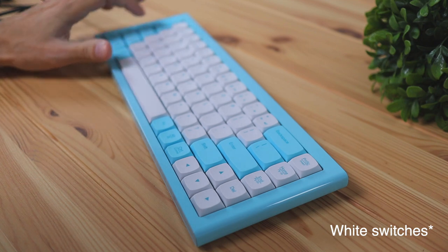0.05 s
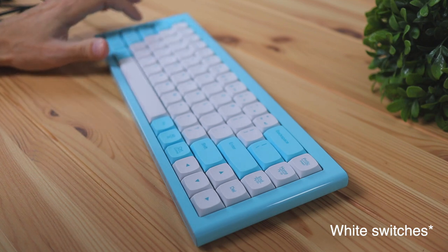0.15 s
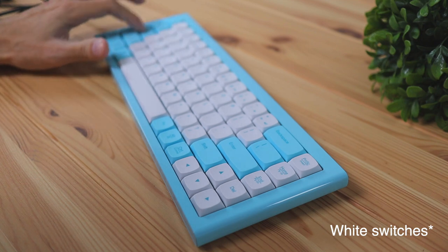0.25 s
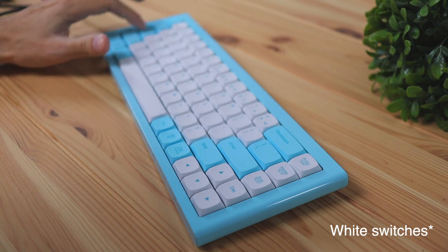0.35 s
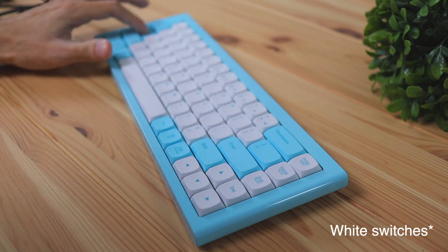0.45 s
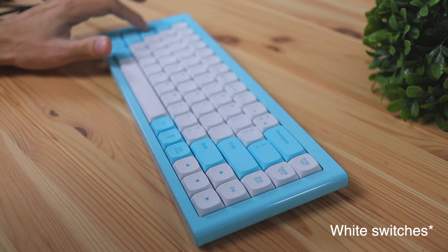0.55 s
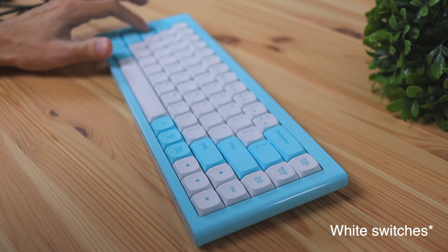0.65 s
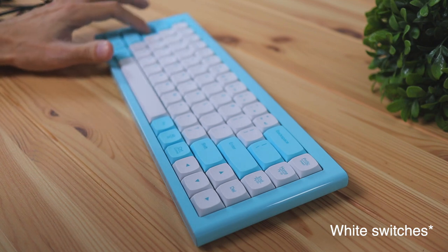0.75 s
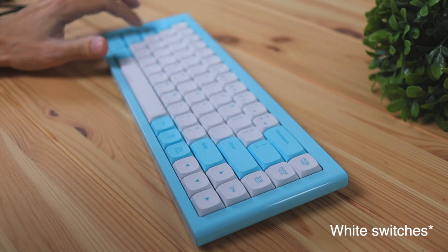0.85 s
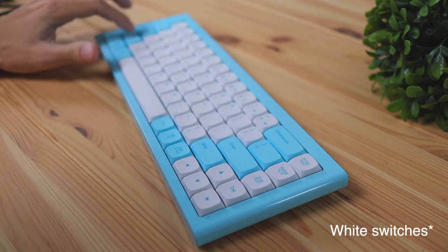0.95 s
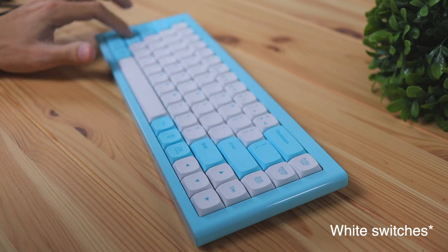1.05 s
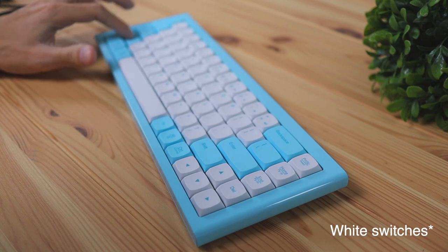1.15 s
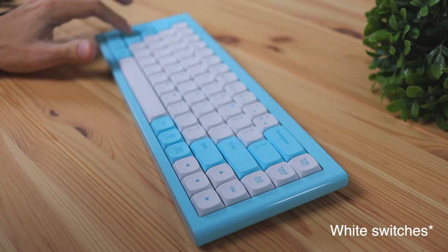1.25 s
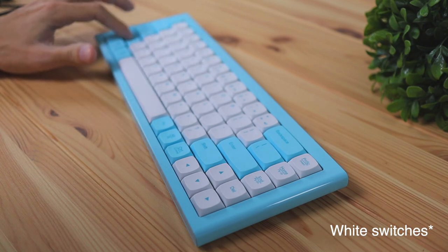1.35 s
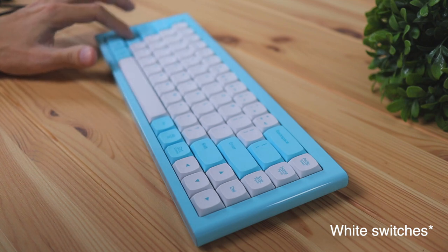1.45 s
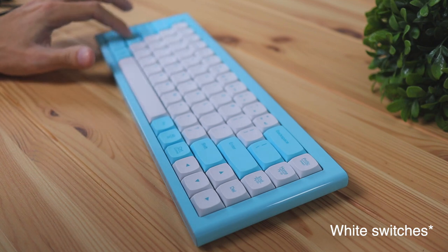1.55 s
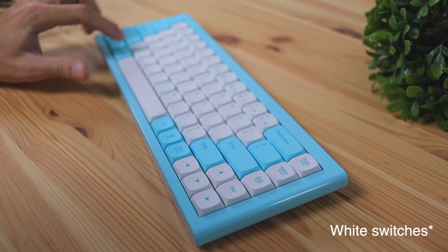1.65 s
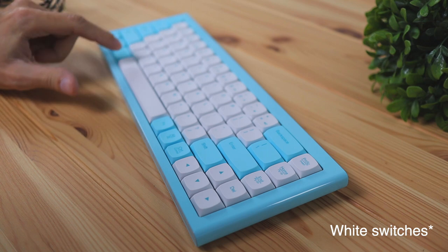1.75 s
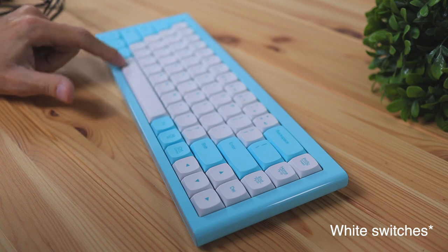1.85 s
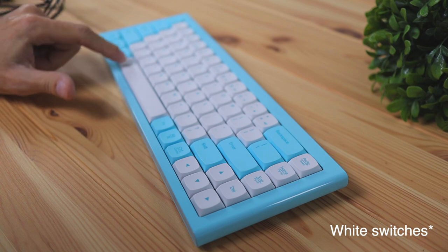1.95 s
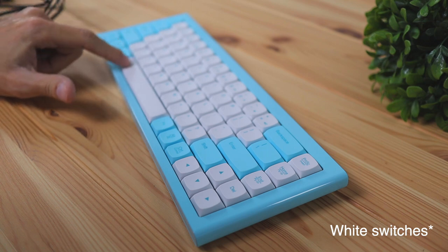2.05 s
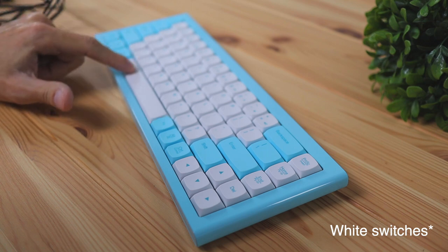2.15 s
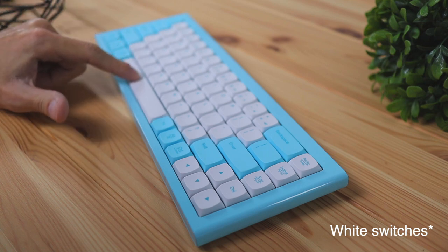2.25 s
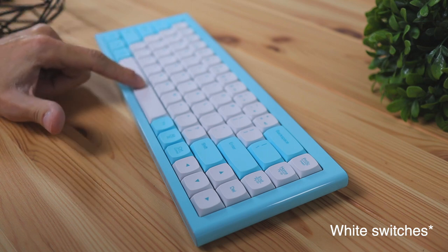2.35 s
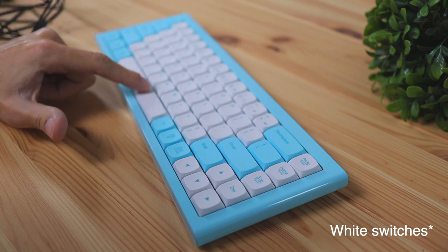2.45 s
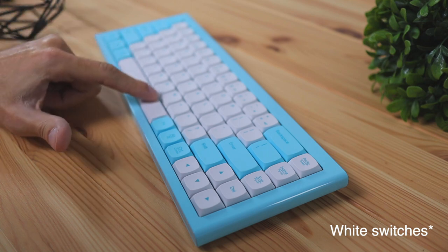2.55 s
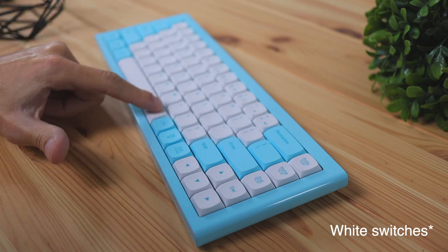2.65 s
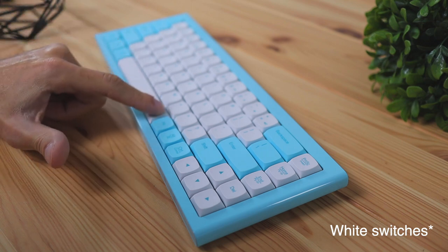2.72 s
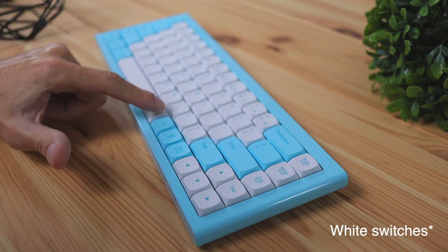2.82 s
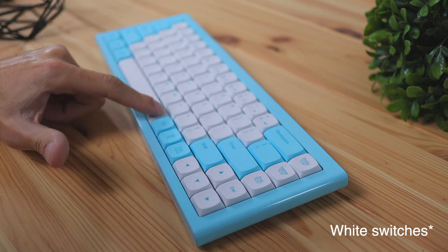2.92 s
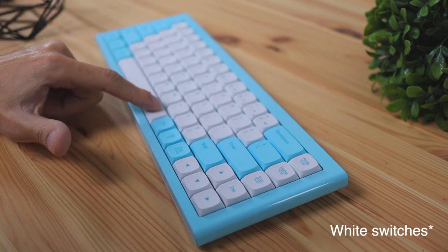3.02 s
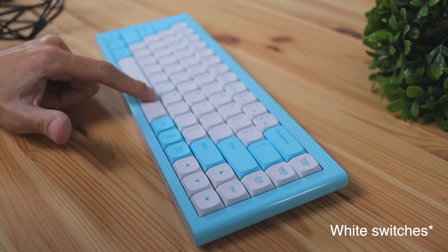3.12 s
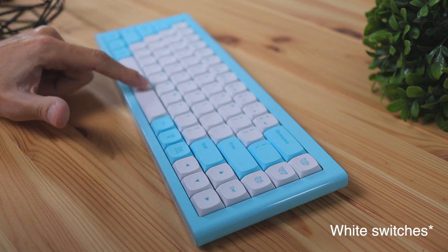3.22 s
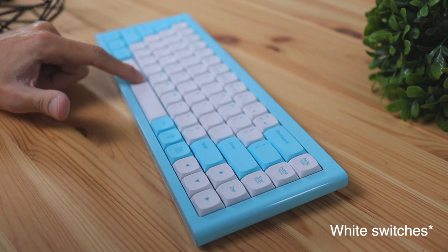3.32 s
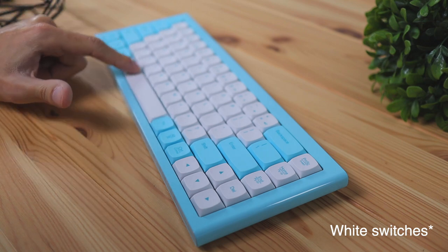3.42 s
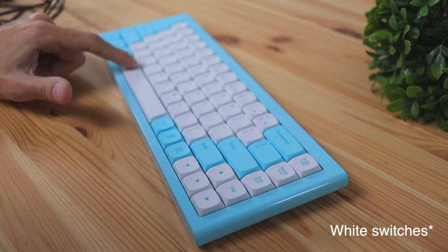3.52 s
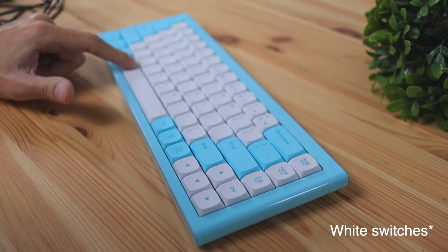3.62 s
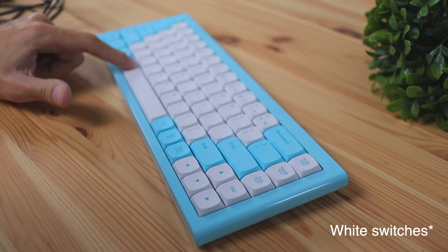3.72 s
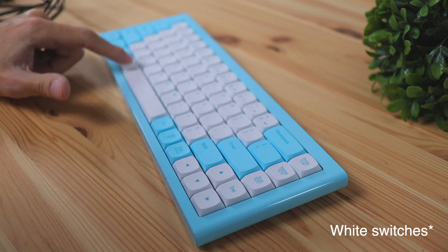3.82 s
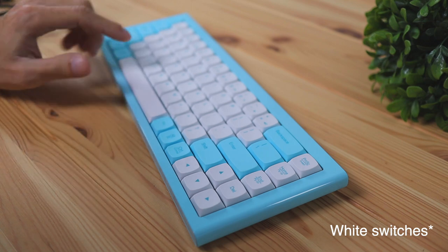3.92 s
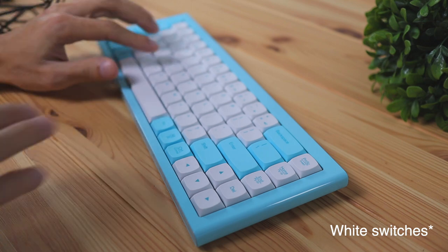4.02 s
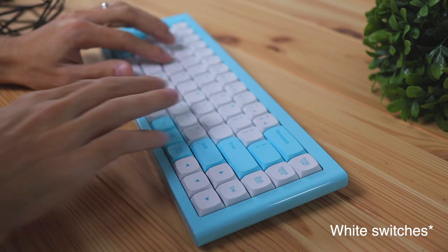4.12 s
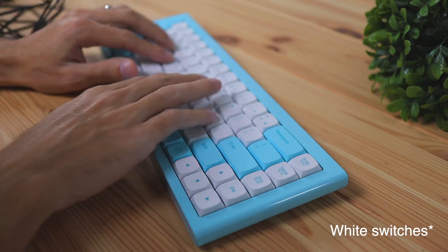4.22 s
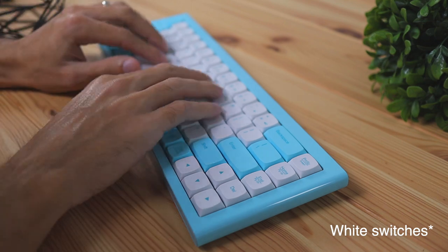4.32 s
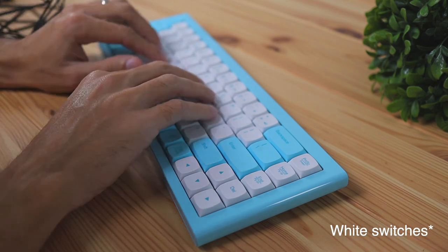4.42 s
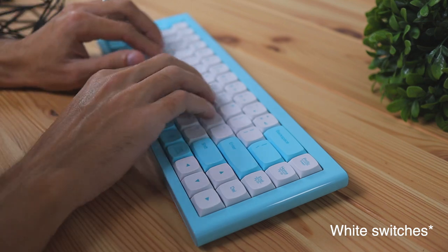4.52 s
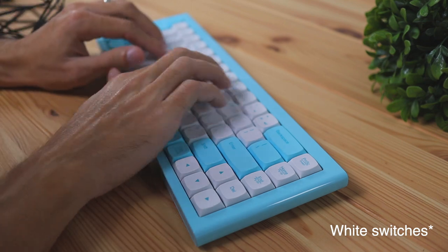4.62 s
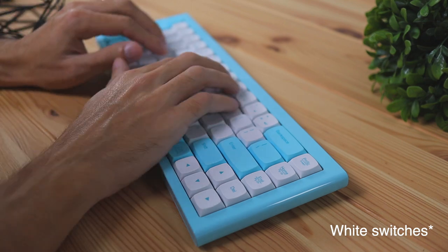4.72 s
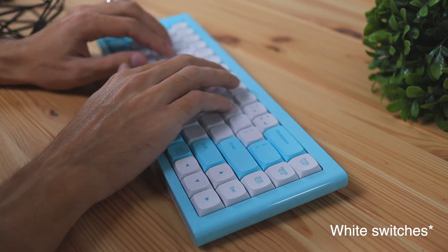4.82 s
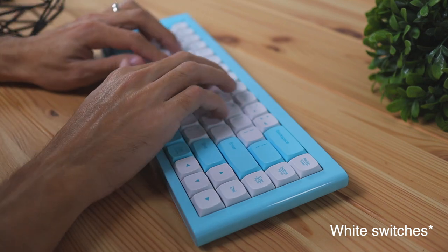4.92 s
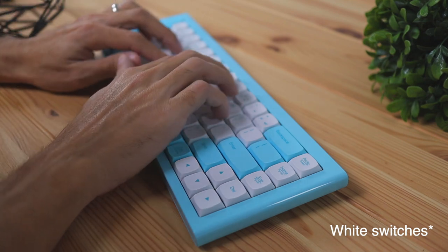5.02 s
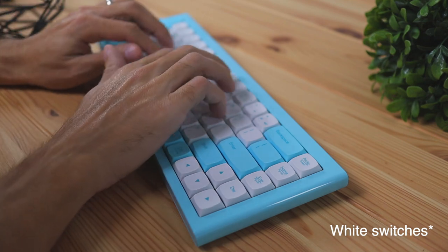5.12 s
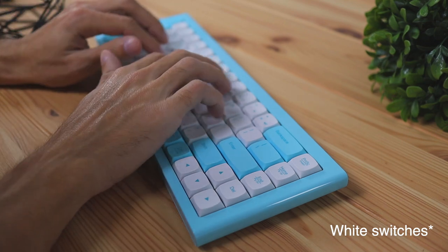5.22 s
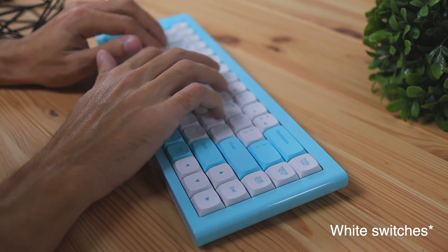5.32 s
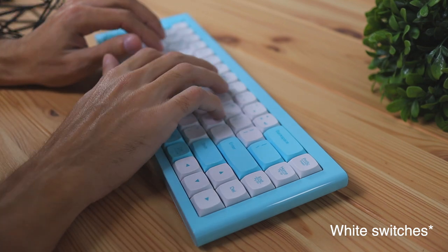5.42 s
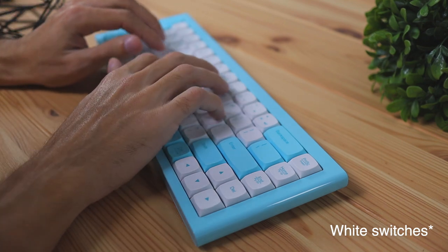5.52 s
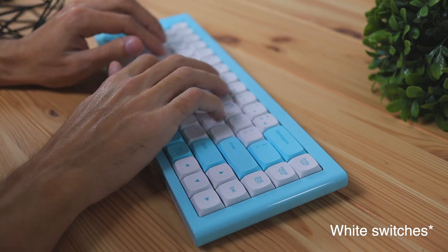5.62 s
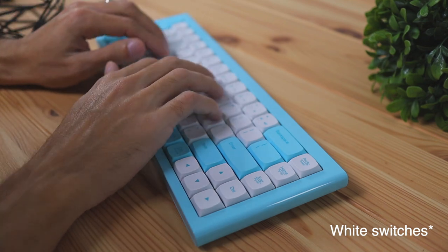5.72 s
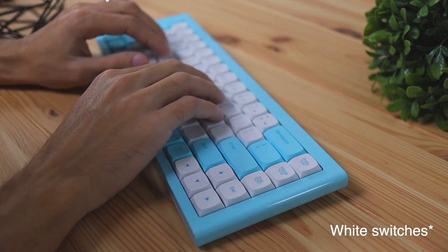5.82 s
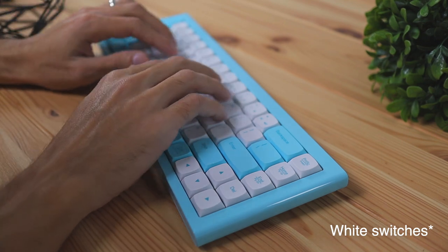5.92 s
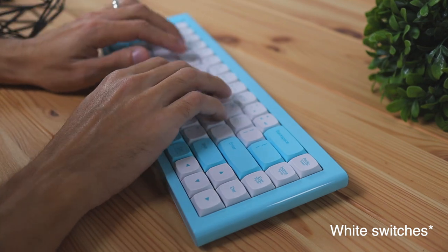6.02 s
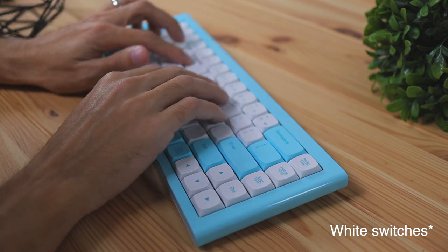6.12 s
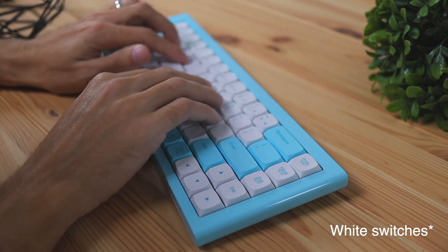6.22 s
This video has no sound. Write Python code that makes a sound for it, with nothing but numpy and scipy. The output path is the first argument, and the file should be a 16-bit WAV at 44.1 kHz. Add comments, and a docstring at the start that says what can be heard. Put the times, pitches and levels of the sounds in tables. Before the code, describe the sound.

Close to a clicky mechanical keyboard on a wooden desk in a small quiet room. Two modifier keys are each pressed four times, every press and release a sharp bright click with a plastic clack. Then the space bar gives fuller, hollow clacks and loose rattle while a fingertip slides along it. After a short near-pause with faint skin rustle, both hands type in uneven quick bursts, with low desk thuds beneath and faint steady rumble and hiss.

```python
"""On a wooden desk in a small quiet room, a clicky mechanical keyboard is heard from close by.
One finger taps two modifier keys, then taps and slides along the space bar; then both hands type.
Switches and keycaps are shaped noise bursts, case and desk are decaying sines, skin is grainy hiss.
Diffuse reflections and a steady rumble and hiss make the room."""
import sys
import numpy as np
from scipy import signal
from scipy.fft import rfft, irfft, next_fast_len
from scipy.io import wavfile
from scipy.ndimage import uniform_filter1d

SR = 44100
rng = np.random.default_rng(int(sys.argv[2]) if len(sys.argv) > 2 else 0)


def int16_out(signal):
    """Quantize to a 16-bit WAV file."""
    q = np.round(np.clip(np.atleast_2d(signal).T, -1, 1) * 32767)
    wavfile.write(sys.argv[1], SR, q.astype(np.int16))


N = 276507
RING = np.arange(SR // 2) / SR  # half a second of time for decaying sounds (s)
FALL_S = 0.0016  # snap to bottom at full force

# When the hand moves on to the space bar and then to the letters, in seconds.
KEY_CHANGES = [1.8, 4.05]
# Colour of the bursts. Each row: frequency in Hz, then level in dB for a modifier blow,
# a space bar blow, a letter blow and a switch click.
COLOURS = [(408, -18, -22, -27, -30.5), (658, -12.5, -1.5, -14.5, -43), (999, -8.5, -17, -16, -2.5),
           (1154, -6, 1.5, -9, -23), (1563, -5.5, -11.5, -11, -9.5), (2450, -2, -2, -3, -1),
           (2930, -3, -5, -6.5, -2), (3810, -1, -1, -6, 4.5), (4970, -2.5, -7, -15, 4.5),
           (6760, -18, -10, -20.5, -3), (7900, -30, -22, -18, 3), (10630, -13, -19, -35, -5),
           (13040, -28, -27, -32, -5), (17200, -57, -41, -27, -16)]
# Keys pushed to the bottom. Each row: switch snap in seconds, force in dB, pitch of the cap in Hz,
# relative weight on the desk in dB.
PRESSES = [(0.3064, -10, 4080, -34), (0.4744, -19, 1400, -35), (0.6341, -19, 1240, -37),
           (0.7791, -18, 3130, -37.5), (1.034, -10.5, 2450, -34), (1.1925, -12, 2000, -33.5),
           (1.3524, -19.5, 1110, -33.5), (1.503, -11.5, 1080, -34), (2.055, -16, 3200, -32),
           (2.249, -20, 3770, -44), (2.915, -15, 4600, -35.5), (3.1392, -17.5, 1320, -57),
           (3.342, -13.5, 4270, -37), (3.5404, -16.5, 1620, -42), (3.782, -12, 4260, -31.5),
           (4.6836, -18.5, 2160, -39), (4.754, -17, 1930, -38.5), (4.8569, -14.5, 2500, -34.5),
           (4.9717, -16, 2560, -32), (5.0309, -17.5, 2300, -38), (5.569, -12.5, 2240, -35.5),
           (5.7481, -19, 4860, -34), (5.876, -12, 4420, -32.5), (6.0278, -7.5, 2180, -38),
           (6.2521, -16.5, 6000, -33.5)]
# Keys let go and thrown back up by their springs. Each row: switch snap in seconds, force in dB,
# pitch of the cap in Hz.
RELEASES = [(0.38, -10.5, 3450), (0.5499, -10.5, 2980), (0.7056, -12.5, 2760), (0.851, -12, 2700),
            (1.109, -14, 4430), (1.274, -13, 3560), (1.4323, -11.5, 3470), (1.584, -13.5, 3170),
            (1.9639, -12, 4140), (2.104, -12.5, 4400), (2.3516, -8.5, 3400), (2.4793, -11.5, 3520),
            (2.8423, -9, 3830), (2.9826, -9, 1350), (3.257, -8.5, 1350), (3.395, -10, 3400),
            (3.851, -10, 1850), (4.7068, -15.5, 5630), (4.8226, -16, 2300), (5.1476, -11, 2390),
            (5.718, -13, 2300), (6.021, -15.5, 2310), (6.2, -20, 2180)]
# Caps knocked by a finger without tripping the switch. Each row: time in seconds, force in dB,
# pitch of the cap in Hz.
TAPS = [(0.3029, -15.5, 4370), (0.466, -22, 3700), (0.615, -29, 5460), (1.0247, -23, 2440),
        (1.1845, -23, 5460), (1.346, -20, 4370), (1.3606, -15, 1870), (1.4895, -22.5, 2400),
        (1.907, -16.5, 3230), (2.282, -25, 4470), (2.43, -11.5, 2650), (2.457, -25.5, 3500),
        (2.532, -20.5, 2210), (2.6322, -17, 1300), (2.666, -20, 2600), (2.8933, -14, 1300),
        (3.0603, -16, 1260), (3.3742, -19.5, 3100), (3.7139, -12.5, 1910), (4.162, -27, 3500),
        (4.1731, -31, 1680), (4.265, -28, 1590), (4.2762, -26.5, 1700), (4.381, -29, 2300),
        (4.5481, -26, 2350), (4.5848, -21.5, 1290), (4.659, -23.5, 2300), (4.7431, -12.5, 2120),
        (4.773, -22.5, 2100), (4.896, -22, 5000), (4.961, -20.5, 4170), (5.0842, -8, 2800),
        (5.2051, -22, 4130), (5.313, -29, 2500), (5.3287, -12.5, 2330), (5.3335, -16.5, 2310),
        (5.3993, -15.5, 2500), (5.741, -20, 1400), (5.862, -19, 4370), (6.1299, -18.5, 1260),
        (6.2368, -19.5, 5530)]


def clicks(snap_t60=(.006, .006, .005), spring_hz=(7700, 8350, 7750), spring_db=(7.5, 2, 7),
           sheen_db=(-3, 1, 1.5), ring_t60=0.059, ring_db=-27, spring_t60=0.094):
    """The switch spring snaps: a very short crack at its own pitch and a faint ring of the housing."""
    # Thin walls of the switch housing. Each row: nominal frequency in Hz, lift in dB.
    housing = [(11300, 3.5), (13500, 6), (15400, 5)]
    out, t = np.zeros(N), RING[:SR // 10]
    hz, *_, db = np.transpose(COLOURS)
    for s, level_db in snaps():
        key = key_group(s)
        rise = 1 - np.exp(-t / .0002)
        envelope = rise * fade(t, snap_t60[key]) + undb(ring_db) * fade(t, ring_t60)
        burst = evened(rng.standard_normal(len(t)) * envelope)
        # the sheen is whatever lies above the spring's pitch
        crack = colour(burst, hz, db + sheen_db[key] * (hz > max(spring_hz)))
        pitch_hz = spring_hz[key] * rng.uniform(.95, 1.06)
        sprung = peak(crack, pitch_hz, spring_db[key] + rng.uniform(-3, 3), q=7)
        # the spring's emphasis fades out
        crack = crack + (sprung - crack) * fade(t, spring_t60)
        for wall_hz, lift_db in housing:
            crack = peak(crack, wall_hz * rng.uniform(.985, 1.015), lift_db, q=18)
        add(out, s, undb(level_db) * unit(band(crack, hz[0], "highpass")))
    return out


def snaps():
    """All that the switches do: full strokes, half strokes and ticks, as (s, level dB)."""
    # Switches that trip while the cap stays clear of its stops. Each row: time in seconds, level in dB.
    half_strokes = [(1.0273, -13.5), (1.037, -14.5), (1.196, -21), (1.341, -14), (1.4895, -16.5),
                    (1.498, -17.5), (1.92, -13), (2.032, -19), (2.173, -19.5), (2.2064, -16.5),
                    (2.316, -17), (2.3484, -26), (2.4194, -14), (2.8127, -13), (3.0887, -14),
                    (3.2011, -14.5), (3.382, -18.5), (3.447, -22), (3.4854, -14), (3.5985, -23),
                    (3.765, -18), (4.591, -26), (4.614, -13.5), (4.886, -17), (4.958, -24), (5.0242, -14.5),
                    (5.133, -16), (5.346, -27.5), (5.8369, -17.5), (5.8543, -18), (6.1376, -15)]
    return strokes() + half_strokes + ticks()


def strokes(snap_db=(-8.5, -6.5, -9), snap_per_force=0.45):
    """Each full press or release snaps the switch; the spring does most of the work: (s, level dB)."""
    # snap_db holds at full force; snap_per_force is in dB per dB
    return [(s, snap_db[key_group(s)] + snap_per_force * force_db)
            for s, force_db, *_ in PRESSES + RELEASES]


def ticks(tick_db=(-8, -6.5, -23.5)):
    """A tap ticks the stem, or on the space bar rattles its stabiliser wire: (s, level dB)."""
    return [(s, force_db + tick_db[key_group(s)]) for s, force_db, _ in TAPS]


def clacks(knocks, impact_t60=(.0045, .008, .004), body_t60=(.015, .024, .014), body_db=-10,
           low_t60=0.052, rattle_db=(-35, -27, -35), rattle_t60=0.39,
           pitch_db=(4, 6, 8), pitch_t60=0.089, cap_db=(-3, -2, 11), cap_t60=0.0059,
           bounce_db=-11, bounce_s=0.0043, contact_s=.00006):
    """Keycaps hit and bounce: dense plastic modes led by the cap's pitch, longer lows, buzzing loose parts."""
    out, t = np.zeros(N), RING[:SR // 10]
    hz, *caps, _ = np.transpose(COLOURS)
    for s, level_db, pitch_hz in knocks:
        key = key_group(s)
        grain = rng.standard_normal(len(t))
        since_bounce = t - bounce_s * rng.uniform(0.59, 1.5)
        bounce = (since_bounce > 0) * fade(abs(since_bounce), impact_t60[key])
        contact = fade(t, impact_t60[key]) + undb(bounce_db) * bounce
        rattle = undb(rattle_db[key]) * fade(t, rattle_t60)
        lows = 2 * band(grain, 1280, "lowpass") * fade(t, low_t60)
        body = grain * fade(t, body_t60[key]) + lows
        blow = grain * (contact + rattle) + undb(body_db) * body
        # after the bounce the loose cap only touches now and then
        blow = blow * np.where(since_bounce > impact_t60[key], chatter(len(t), 6), 1)
        # a gentle touch takes longer to build up than a hard blow
        blow = blow * (1 - np.exp(-t * undb(level_db) / contact_s))
        blow = colour(evened(blow), hz, caps[key])
        # the emphasis on the cap's own pitch fades out
        pitched = peak(blow, pitch_hz, pitch_db[key], q=3.9)
        blow = blow + (pitched - blow) * fade(t, pitch_t60)
        # a hard blow sets the whole cap ringing for a few cycles, the small letter caps most of all
        ring = np.sin(2 * np.pi * pitch_hz * t) * (fade(t, cap_t60) - fade(t, cap_t60 / 2))
        knock = unit(band(blow, hz[0], "highpass")) + undb(cap_db[key] + level_db) * unit(ring)
        add(out, s, undb(level_db) * knock)
    return out


def blows(held_db=0, fall_per_force=0.58, return_s=0.0028):
    """Caps meet bottom or top a few milliseconds after the snap, taps at once: (s, level dB, pitch Hz)."""
    # a softer finger takes longer to reach the bottom
    down = [(s + FALL_S / undb(fall_per_force * force_db), force_db, hz) for s, force_db, hz, _ in PRESSES]
    # the spring drives the return, so it always takes the same time
    up = [(s + return_s, force_db, hz) for s, force_db, hz in RELEASES]
    # held_db changes the blows made with the finger still on the cap
    return up + [(s, force_db + held_db, hz) for s, force_db, hz in down + TAPS]


def easings(lead_s=.019, force_db=-30, cap_hz=1400):
    """As the finger eases off a modifier, the cap rocks before the release: (s, force dB, pitch Hz)."""
    return [(s - lead_s, force_db, cap_hz) for s, *_ in RELEASES if s < KEY_CHANGES[0]]


def fidgets(cap_hz=2300, spread_octaves=1.9, count=18, spread_db=3):
    """Loose caps knock faintly at random moments under shifting fingers: (s, level dB, pitch Hz)."""
    # Fingers shifting on the keys. Each row: start in seconds, end in seconds, mean level in dB.
    shifts = [(1.951, 3.55, -33.5), (4.703, 5.095, -36.5)]
    return [(rng.uniform(start, end),
             level_db + spread_db * rng.standard_normal(),
             cap_hz * 2 ** rng.uniform(-spread_octaves, spread_octaves))
            for start, end, level_db in shifts for _ in range(count)]


def case(swell_s=0.0036, blur=0.026, detune_share=0.013, finger_db=-3, push_db=-15, flex_hz=400,
         corner_until_s=0.84, corner_db=-8.5):
    """Blows ring the modes of the case, and the weight of a full press flexes those below flex_hz."""
    # Case and plate, the lowest mode being the whole board on its feet. Each row: nominal frequency
    # in Hz, 60 dB decay in seconds, drive in dB under a modifier, the space bar and a letter.
    case_modes = [(105.8, 0.21, -29, -26.5, -28.5), (180.2, 0.34, -34.5, -24, -30.5),
                  (225.7, 0.23, -35, -25, -38), (254.2, 0.23, -46, -22, -38),
                  (288.6, 0.31, -34, -26.5, -37.5), (322.7, 0.35, -38, -30.5, -45.5),
                  (487.2, 0.19, -21, -30.5, -35.5), (535, 0.22, -25, -27.5, -35.5),
                  (675, 0.11, -26.5, -25.5, -34), (1173, 0.072, -21, -21.5, -21),
                  (1322, 0.067, -35, -19.5, -23.5), (1511, 0.071, -40, -16.5, -27)]
    out, t = np.zeros(N), RING[:SR // 4]
    hz, t60, *drive_db = np.transpose(case_modes)[:, :, None]
    knocks = []
    # a finger on the cap damps the blow
    for s, level_db, _ in blows(held_db=finger_db):
        # the first modifier sits in the stiff corner of the case and rings it less
        stiffness_db = corner_db * (s < corner_until_s)
        knocks.append((s, undb(drive_db[key_group(s)] + level_db + stiffness_db)))
    pushes = [(s + FALL_S, undb(weight_db + push_db) * (hz < flex_hz)) for s, _, _, weight_db in PRESSES]
    for s, drive in knocks + pushes:
        detune, strength = rng.standard_normal((2, len(hz), 1))
        # a random drift of phase blurs each mode's pitch a little
        drift = blur * np.cumsum(rng.standard_normal((len(hz), len(t))), axis=1)
        phase = 2 * np.pi * hz * (1 + detune_share * detune) * t + drift
        modes = np.sin(phase) * fade(t, t60)
        # every blow pushes each mode with its own random strength and direction
        gains = np.sign(detune * strength) * undb(2.67 * strength) * drive
        add(out, s, np.sum(gains * modes, axis=0) * (1 - np.exp(-t / swell_s)))
    return band(out, 2 * hz.max(), "lowpass")


def desk(desk_hz=92, desk_t60=0.17, swell_s=0.0027, thud_db=5, lag_s=0.0051):
    """The weight of the finger sets the desk top swinging for a few cycles around desk_hz."""
    out, t = np.zeros(N), RING
    for s, _, _, weight_db in PRESSES:
        swing = np.sin(2 * np.pi * desk_hz * t * rng.uniform(.82, 1.12))
        envelope = fade(t, desk_t60) * (1 - np.exp(-t / swell_s))
        add(out, s + lag_s, undb(weight_db + thud_db) * swing * envelope)
    return band(out, desk_hz / 2, "highpass")


def stems(scrape_db=-19, travel_s=0.0035):
    """The stem scrapes along its guide in the moment before a full stroke or a tap."""
    out = np.zeros(N)
    hz, db, *_ = np.transpose(COLOURS)
    for s, level_db in strokes() + ticks():
        size = int(SR * travel_s * rng.uniform(0.46, 2.8))
        swell = rng.standard_normal(size) * np.linspace(0, 1, size)
        scrape = band(colour(swell, hz, db), 800, "highpass")
        gain = undb(level_db + scrape_db + 2 * rng.standard_normal())
        add(out, s - size / SR, gain * unit(scrape))
    return out


def slide(grain_db=6, low_hz=1000, top_hz=18000, cap_hz=2300, cap_db=6.5, attack_s=0.02, release_s=0.084):
    """Skin catches and slips on textured keycaps: grainy hiss in spurts, coloured by the hollow caps."""
    # A finger sliding over the keycaps. Each row: start in seconds, end in seconds, level in dB.
    strokes_of_skin = [(2.058, 2.68, -49.5), (2.955, 3.5, -51), (4.25, 4.295, -51.5), (4.287, 4.447, -52),
                       (4.558, 5.226, -53.5)]
    t = np.arange(N) / SR
    slips = uniform_filter1d(chatter(N, 6, hold_s=.016), SR // 100)
    grains = rng.standard_normal(N) * chatter(N, grain_db, hold_s=0.00057)
    hiss = band(band(grains * slips, low_hz, "highpass"), top_hz, "lowpass")
    hiss = peak(hiss, cap_hz, cap_db, q=0.54)
    contact = np.zeros(N)
    for start, end, level_db in strokes_of_skin:
        attack = np.clip((t - start) / attack_s, 0, 1)
        release = np.exp(-np.maximum(t - end, 0) / release_s)
        contact += undb(level_db) * attack * release
    return hiss / hiss.std() * contact


def room(dry, wet_db=-14, room_t60=0.34, treble_t60=0.15, split_hz=7000, shift_hz=3.1):
    """Diffuse reflections, the top dying first; their pattern keeps shifting at a steady rate."""
    out, turn = np.zeros(N), 2 * np.pi * shift_hz * np.arange(N) / SR
    # the sound turns steadily between two unrelated tails
    for share in np.cos(turn), np.sin(turn):
        noise = rng.standard_normal(len(RING))
        lows = band(noise, split_hz, "lowpass") * fade(RING, room_t60)
        highs = band(noise, split_hz, "highpass") * fade(RING, treble_t60)
        tail = lows - highs
        out += signal.fftconvolve(dry * share, tail / np.linalg.norm(tail))[:N]
    return undb(wet_db) * out


def air(level_db=-53.5):
    """The low, steady rumble and hiss of the quiet room, as coloured noise."""
    # Spectrum of the room noise. Each row: frequency in Hz, relative level in dB.
    spectrum = [(25, -26), (58, 8.5), (130, -12), (1000, -20.5), (4000, -32), (16000, -35)]
    noise = colour(rng.standard_normal(N), *np.transpose(spectrum))
    return noise / noise.std() * undb(level_db)


def key_group(s):
    """Keys in play at time s: 0 modifiers, 1 space bar, 2 letters."""
    return np.searchsorted(KEY_CHANGES, s)


def chatter(size, depth_db, hold_s=0.0018):
    """Small contacts that come and go: random gains within +-depth_db, each held for a moment."""
    hold = int(SR * hold_s)
    steps = rng.uniform(-1, 1, size // hold + 1)
    return undb(depth_db * np.repeat(steps, hold)[:size])


def undb(db):
    """Decibels to gain."""
    return 10 ** (np.asarray(db) / 20)


def unit(x):
    """Scale a burst to the energy of one millisecond at full level."""
    return x / np.sqrt(np.sum(x ** 2) * 1000 / SR)


def fade(t, t60):
    """Exponential decay, 60 dB down after t60 seconds."""
    return np.exp(-np.log(1000) * t / t60)


def add(track, s, sound):
    """Mix a sound into a track at time s."""
    i = int(s * SR)
    track[i:i + len(sound)] += sound[:len(track) - i]


def colour(x, hz, db):
    """Causal filter with the given spectrum, built from its cepstrum."""
    size = 2 * next_fast_len(len(x))
    f = np.maximum(np.fft.rfftfreq(size, 1 / SR), 1)
    cepstrum = irfft(np.log(undb(np.interp(np.log(f), np.log(hz), db))))
    # fold the second half onto the first, so that the filter never sounds ahead of its input
    cepstrum[1:size // 2] *= 2
    cepstrum[size // 2 + 1:] = 0
    return irfft(rfft(x, size) * np.exp(rfft(cepstrum)))[:len(x)]


def band(x, hz, kind):
    """Second-order low-pass or high-pass."""
    return signal.sosfilt(signal.butter(2, hz, kind, fs=SR, output="sos"), x)


def peak(x, hz, db, q):
    """Raise one resonance above the rest of the spectrum."""
    return x + (undb(db) - 1) * signal.lfilter(*signal.iirpeak(hz, q, fs=SR), x)


def evened(x, width_hz=1500):
    """Level out the broad humps of a burst, keep its fine resonances and let it end in silence."""
    spectrum = rfft(x)
    power = uniform_filter1d(np.abs(spectrum) ** 2, int(width_hz * len(x) / SR) + 1)
    return irfft(spectrum / np.sqrt(power), len(x)) * np.linspace(1, 0, len(x))


def scene():
    """Keyboard, desk and room, the same in both channels."""
    knocks = blows() + easings() + fidgets()
    keys = clicks() + clacks(knocks) + case() + desk() + stems() + slide()
    return np.tile(keys + room(keys) + air(), (2, 1))


def record(dry):
    """A steep low-pass removes the top of the treble."""
    top_hz = 16100
    return signal.sosfilt(signal.ellip(8, .2, 70, top_hz, fs=SR, output="sos"), dry)


dry = scene()
out = record(dry)
int16_out(out)
```